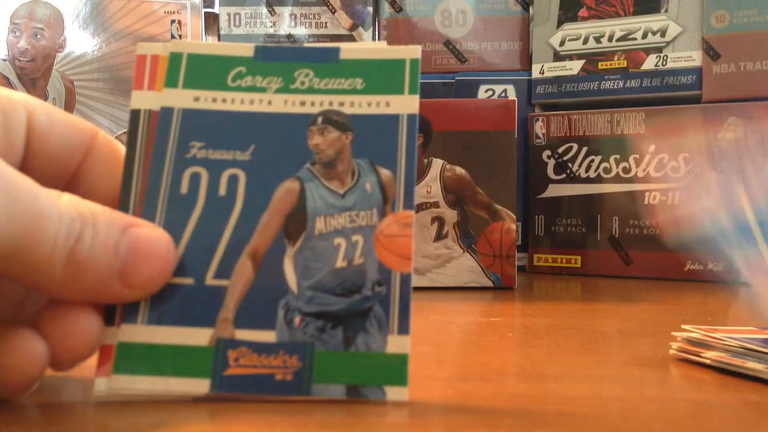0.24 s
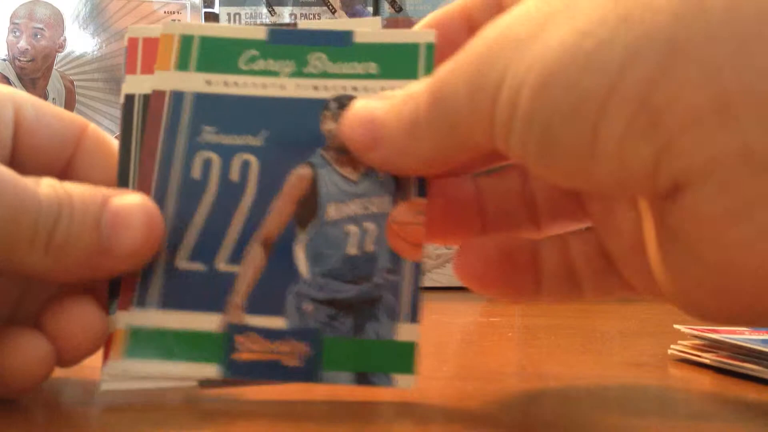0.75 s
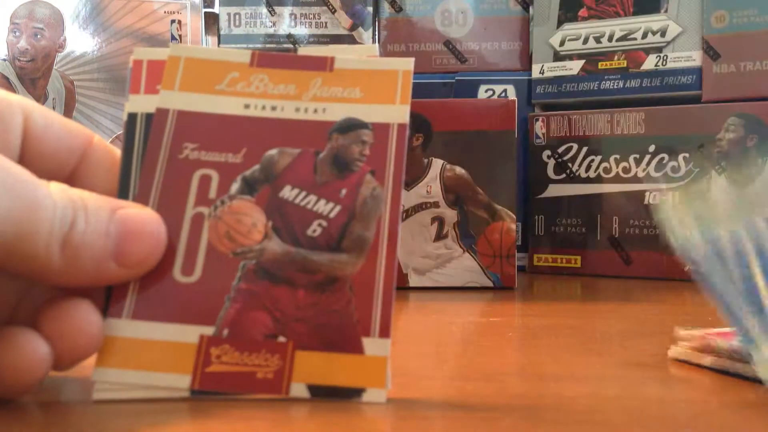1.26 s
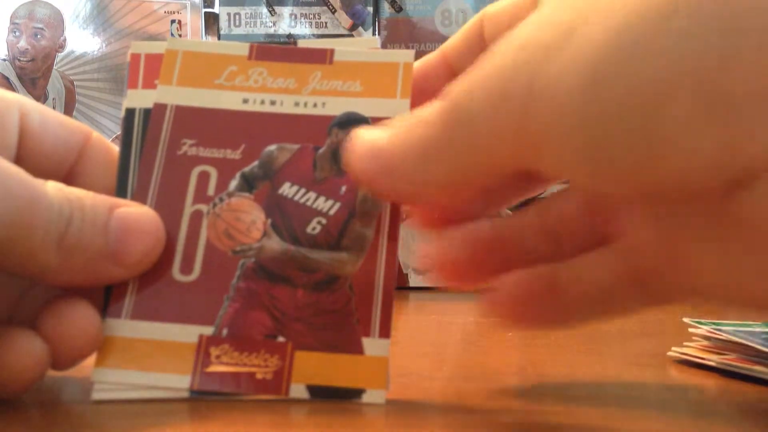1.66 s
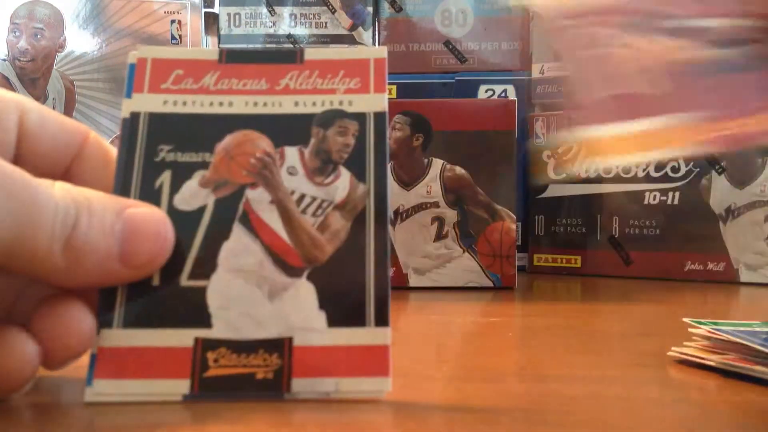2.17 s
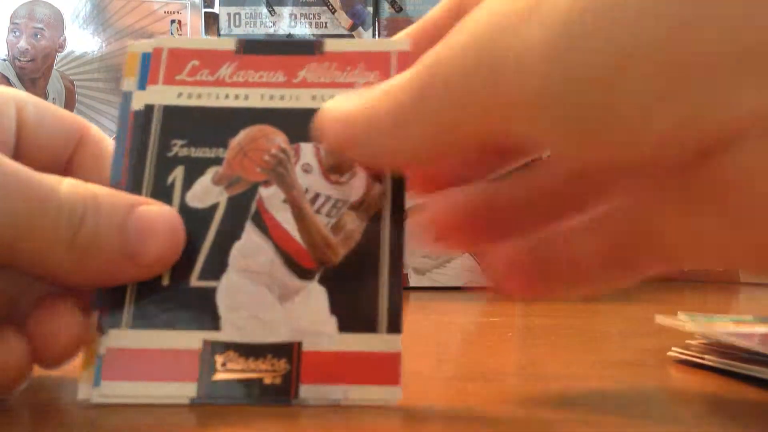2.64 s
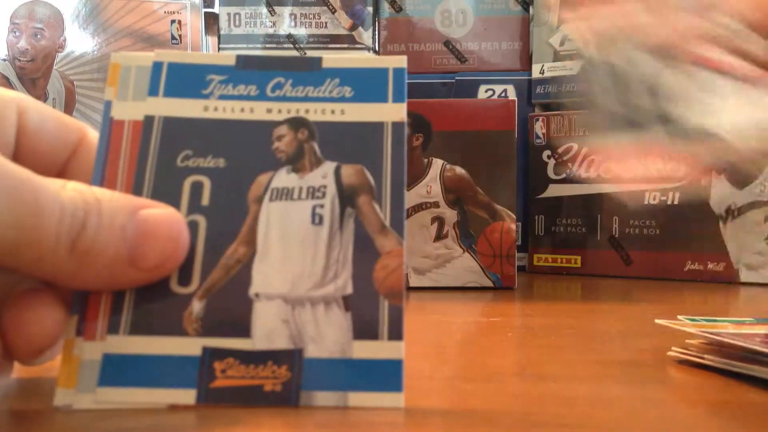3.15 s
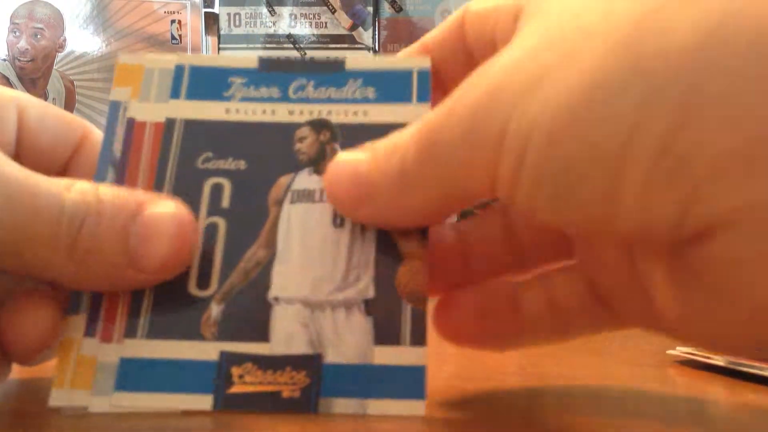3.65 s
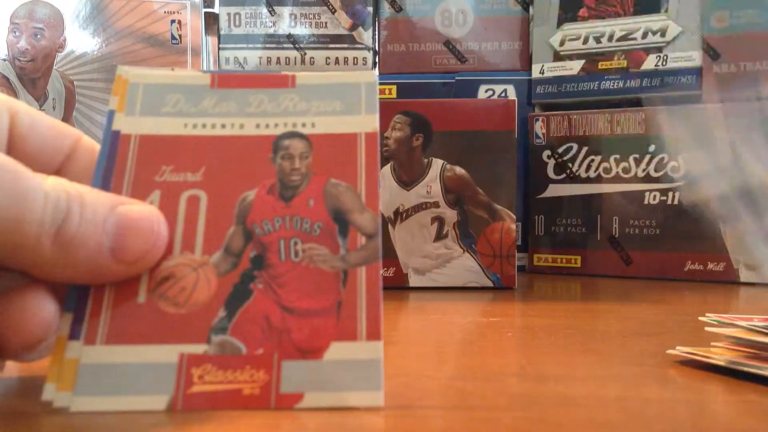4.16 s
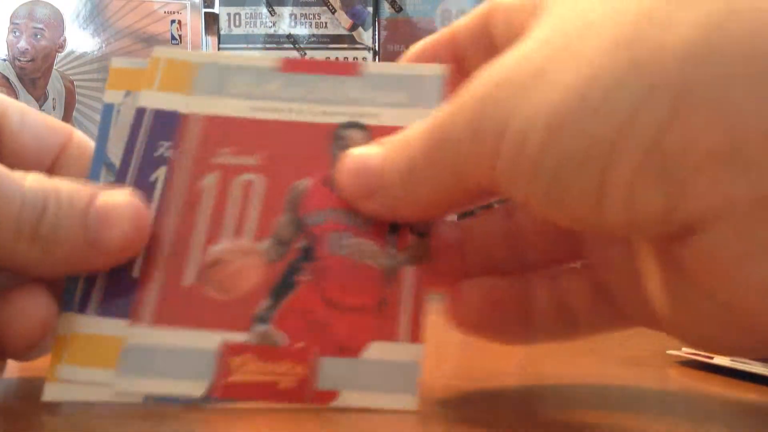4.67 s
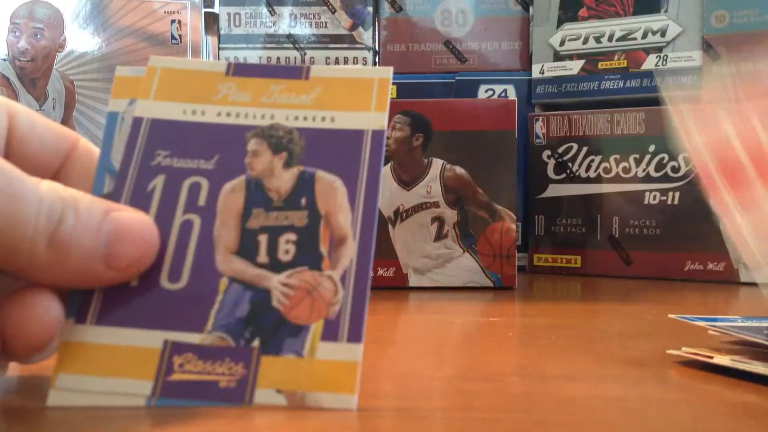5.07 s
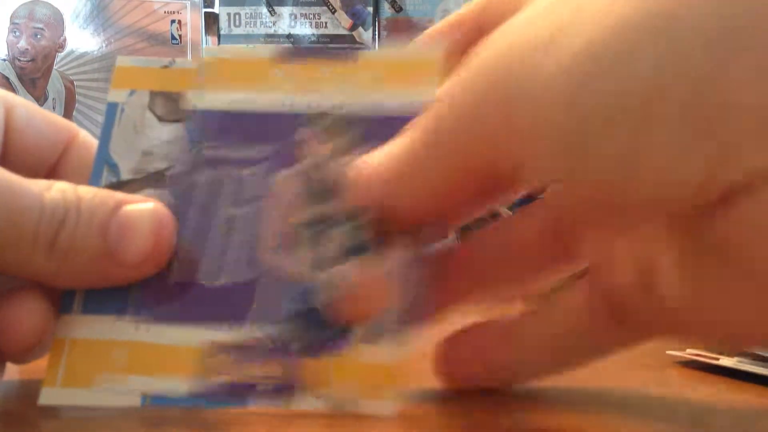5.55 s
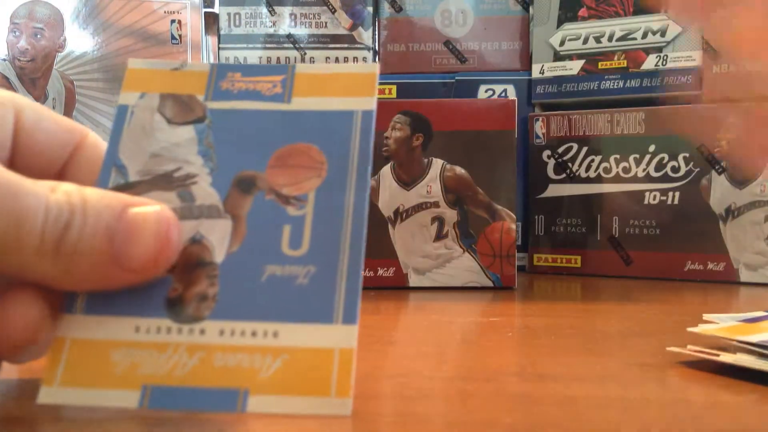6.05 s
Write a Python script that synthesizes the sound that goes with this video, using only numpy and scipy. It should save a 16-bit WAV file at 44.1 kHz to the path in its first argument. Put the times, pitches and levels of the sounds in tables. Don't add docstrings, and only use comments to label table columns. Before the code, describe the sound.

Close up in a small room, seven cards slap down about a second apart, each with a crisp crack and dull table thud.

```python
import sys
import numpy as np
from scipy import signal
from scipy.fft import rfft, irfft
from scipy.io import wavfile
from scipy.ndimage import uniform_filter1d

SR = 44100
rng = np.random.default_rng(int(sys.argv[2]) if len(sys.argv) > 2 else 0)


def invert_db(x):
    u = np.asarray(x, float) / 20
    return 10 ** u


def materialize(psi):
    bounded = np.clip(np.atleast_2d(psi).T, -1, 1)
    quanta = np.round(bounded * 32767).astype(np.int16)
    wavfile.write(sys.argv[1], SR, quanta)


N = 278295

# [f/Hz, width/Hz, level/dB]
CARD_MODES = [(1420, 510, -6), (1710, 420, -9), (2030, 280, -4.5), (2440, 930, -8.5), (3180, 1600, -10),
              (4400, 1400, -12), (5100, 2170, -12.5)]
# [f/Hz, width/Hz, level/dB]
PILE_MODES = [(258, 100, 3), (393, 78.5, 6), (546, 180, 2), (654, 130, -1.5), (852, 352, 1)]
# [t/s, peak level/dB, card ring f/Hz, pile knock re peak/dB]
FIRST_TOUCHES = [
    (0.3504, -24, 1870, -2),
    (1.3245, -28.5, 1940, 3.5),
    (1.329, -34, 1320, 1),
    (2.384, -34.5, 1800, 0.5),
    (2.392, -39.5, 1647, 0),
    (3.3108, -29.5, 1843, -1),
    (4.2571, -22, 1790, -8),
    (5.1989, -22.5, 1650, -8.5),
    (5.9536, -31, 2410, 4.5),
]


def ring(x, hz, width):
    return signal.lfilter(*signal.iirpeak(min(hz, .45 * SR), hz / max(width, 5), fs=SR), x)


def steep(x, hz, width):
    return ring(ring(x, hz, width), hz, width)


def modes(x, table):
    return sum((-1) ** k * invert_db(db) * steep(x, hz, width) for k, (hz, width, db) in enumerate(table))


def above(x, hz):
    return signal.sosfilt(signal.butter(3, hz, "high", fs=SR, output="sos"), x)


def below(x, hz, order=2):
    return signal.sosfilt(signal.butter(order, min(hz, .45 * SR), fs=SR, output="sos"), x)


def peak1(x):
    return x / np.abs(x).max()


def rms1(x):
    return x / np.sqrt(np.mean(x ** 2))


def add(out, s, x):
    i = int(s * SR)
    out[i:i + len(x)] += x[:N - i]


def walk(rate):
    k = int(SR / rate)
    steps = np.repeat(rng.standard_normal(N // k + 1), k)
    return 1.3 * uniform_filter1d(uniform_filter1d(steps, k), k)[:N]


def hush():
    # [f/Hz, level per Hz/dB]
    colour = [(18, -38.5), (30, -6.5), (110, -8), (190, -4.5), (290, -5), (735, -19.5), (1920, -24),
              (15000, -24)]
    hz_at, db_at = np.transpose(colour)
    hz = np.maximum(np.fft.rfftfreq(N, 1 / SR), 1)
    gain = invert_db(np.interp(np.log(hz), np.log(hz_at), db_at))
    noise = irfft(rfft(rng.standard_normal(N)) * gain, N)
    hiss = signal.sosfiltfilt(signal.butter(2, 700, "high", fs=SR, output="sos"), noise)
    rumble = (noise - hiss) * invert_db(1.8 * walk(3) + 1.8 * walk(14))
    return invert_db(-62) * rms1(hiss + rumble)


def landing_blows():
    # [t/s, peak level/dB, card ring f/Hz, edge click re peak/dB, pile knock re peak/dB]
    rattles = [
        (1.3529, -18, 3570, -12, -6),
        (1.3524, -21, 2312, -24, -11.5),
        (1.3635, -20.5, 2150, -6.5, -10.5),
        (2.0931, -36.5, 1344, -62, -12),
        (2.4273, -42, 1790, -4.5, 4.5),
        (3.359, -17.5, 1775, -5, -10.5),
        (4.2819, -16.5, 2440, -13, -12),
        (4.2987, -15, 2230, -3.5, -0.5),
        (5.9686, -30, 2100, -14, -3.5),
        (5.9818, -27.5, 3150, 10.5, -4),
    ]
    # [t/s, peak level/dB, card ring f/Hz, edge click re peak/dB, pile knock re peak/dB]
    face_snaps = [(0.3855, -23, 2440, -5, -31), (1.3707, -15, 4500, -10, -27), (1.3758, -24, 1727, -6, -26),
                  (1.38, -28.5, 2990, 2, 3), (3.3361, -8.5, 2440, -11, -10), (3.3622, -14.5, 3310, 1, -12),
                  (5.22, -12, 2430, -6, -6), (5.229, -23, 2480, -16, -5), (5.2392, -19.5, 2650, -17, -18.5),
                  (5.2478, -16.5, 3233, 0.5, -5), (5.987, -17.5, 3340, -11, -17)]
    # [t/s, peak level/dB, card ring f/Hz]
    bounces = [(0.3775, -34, 2000), (0.3942, -33.5, 3050), (0.3984, -43, 2020), (1.3395, -33, 2030),
               (1.3704, -28.5, 1810), (3.324, -34, 2580), (3.35, -22.5, 3660), (3.3724, -35.5, 3180),
               (3.3825, -41, 4580), (5.2138, -30, 2570), (4.318, -28, 2100), (5.2576, -31, 2410)]
    return ([(s, db, hz, -24, knock_db, 4.4) for s, db, hz, knock_db in FIRST_TOUCHES]
            + [(*row, 6.5) for row in rattles]
            + [(*row, 2.6) for row in face_snaps]
            + [(s, db, hz, -11, -10, 2.9) for s, db, hz in bounces])


def blows():
    # [t/s, peak level/dB, card ring f/Hz, stack knock re peak/dB]
    grips = [(0.7167, -51.5, 1540, -24), (0.726, -44, 1420, -3), (1.1265, -54.5, 1710, -13),
             (1.8184, -51, 965, 1), (2.7309, -50.5, 1230, 3.5), (2.7665, -41.5, 1120, 4.5),
             (3.0131, -53.5, 1370, -2.5), (3.7166, -36.5, 1440, -1), (3.7218, -40.5, 1440, -9),
             (3.8062, -54, 1500, -10), (3.907, -48, 2210, -27), (3.93, -47, 1520, -16),
             (3.9708, -41.5, 1295, -10), (3.9997, -37, 1420, -15), (4.6078, -46, 1390, -1),
             (4.6345, -48, 1510, 1.5), (4.8415, -35, 1510, 1), (4.8616, -46, 1400, -7),
             (5.6032, -47.5, 1480, 1), (5.6682, -47, 1443, -16), (5.7354, -33.5, 2300, -26),
             (5.735, -34, 910, -2.5), (2.0929, -38.5, 1930, -2.5), (4.8423, -38.5, 2760, -1),
             (4.036, -39.5, 1420, -15)]
    # [t/s, peak level/dB, card ring f/Hz, stack knock re peak/dB]
    flicks = [(0.7716, -48.5, 1400, -4), (0.8631, -57.5, 1060, 6.5), (0.9894, -53, 1300, 6),
              (1.0668, -49.5, 2180, -19), (1.1069, -47, 2150, -5.5), (2.1735, -45.5, 940, -6),
              (2.7147, -50, 2150, 1), (2.7861, -44, 1370, -1.5), (2.8247, -49.5, 1370, -11),
              (2.84, -48.5, 1380, -16), (2.8822, -56.5, 1340, -2), (2.912, -50.5, 2730, -4),
              (3.076, -43.5, 1250, -0.5), (3.089, -34, 1380, -10), (3.8004, -46, 1640, -13),
              (4.7351, -51.5, 2190, -2.5), (4.767, -52, 1440, -13), (4.9451, -41, 1360, -0.5),
              (5.1065, -49.5, 1045, -6), (5.6228, -36.5, 1412, 3.5), (5.7163, -38, 2530, -24)]
    return (landing_blows()
            + [(s, db, hz, -40.5, knock_db, 3.4) for s, db, hz, knock_db in grips]
            + [(s, db, hz, -6, knock_db, 1.3) for s, db, hz, knock_db in flicks])


def pressure():
    # [start t/s, hardest t/s, end t/s, scrape level/dB, surface hiss re scrape/dB]
    strokes = [(0.0, 0.009, 0.077, -65, -6), (0.709, 0.708, 0.75, -62, -10),
               (0.873, 0.977, 0.97, -64.5, -15), (0.993, 1.112, 1.16, -64.5, -1),
               (1.775, 1.804, 3.4, -77.5, -8), (2.063, 2.138, 2.09, -59.5, -25),
               (2.4, 2.4, 2.44, -47.5, -14), (2.683, 2.718, 2.86, -72, -5), (2.797, 2.892, 3.05, -68.5, -4),
               (2.95, 3.03, 3.06, -69, -28), (3.083, 3.116, 3.134, -51.5, -5),
               (3.133, 3.16, 3.21, -63.5, -7.5), (3.299, 3.32, 3.313, -52.5, -17.5),
               (3.622, 3.712, 3.87, -66, -35), (3.78, 3.95, 3.97, -65.5, -26),
               (3.97, 3.992, 3.99, -54, -12), (3.994, 4.033, 4.052, -51, -8.5),
               (4.596, 4.612, 4.77, -65, -21), (4.75, 4.794, 4.88, -64.5, -17), (4.85, 4.95, 5, -60, -15),
               (4.947, 4.981, 4.99, -50.5, -5.5), (4.994, 5.028, 4.9, -72.5, -4),
               (5.619, 5.64, 5.75, -59.5, -14), (5.674, 5.692, 5.731, -54, -8)]
    rise_db, fall_db, rumble_db = 8.5, 16, 3
    t, gain = np.arange(N) / SR, np.zeros((3, N))
    for start, hardest, end, db, hiss_db in strokes:
        now = slice(max(int(start * SR), 0), int(end * SR))
        stroke_db = db - np.interp(t[now], [start, hardest, end], [rise_db, 0, fall_db])
        gain[:, now] += invert_db(stroke_db + np.array([[0], [hiss_db], [rumble_db]]))

    before_db, before_s = (-28, -27.5, -30), 0.0022
    after_db, after_s = (-16, -20, -13.5), 0.0064
    drag_delay_s = .0026
    for s, db, hz, edge_db, knock_db, ms in landing_blows():
        now = slice(int(s * SR) - 2048, int(s * SR) + 4096)
        since = t[now] - s - drag_delay_s
        own_db = db + np.array([0, edge_db, 0])
        before = invert_db(own_db + before_db)[:, None] * np.exp(-abs(since) / before_s)
        after = invert_db(own_db + after_db)[:, None] * np.exp(-abs(since) / after_s)
        airborne = any(s == touch[0] for touch in FIRST_TOUCHES)
        gain[:, now] += np.where(since < 0, before * (not airborne), after)
    return gain


def slides():
    # [ratio to the grip's ring, level/dB]
    singing = [(0.5, -7), (1, 4.5), (1.56, -4.5), (2.5, -9)]
    sing_db, sing_width_hz = -4, 170
    grains = rng.standard_normal(N) * invert_db(2.0 * rng.exponential(size=N)) * invert_db(2.5 * walk(160))
    swish = rng.standard_normal(N) * invert_db(2.0 * walk(220))
    card = rms1(modes(grains, CARD_MODES))
    blow_s, blow_hz = np.transpose(sorted(blows()))[[0, 2]]
    halfway_s = (blow_s[1:] + blow_s[:-1]) / 2
    edges = np.r_[0, (halfway_s * SR).astype(int), N]
    for a, b, hz in zip(edges, edges[1:], blow_hz):
        rings = [(ratio * hz, sing_width_hz, db) for ratio, db in singing]
        card[a:b] = 0.87 * card[a:b] + invert_db(sing_db) * rms1(modes(grains[a:b], rings))
    hiss = rms1(below(above(swish, 3700), 6800, order=4))
    rumble = rms1(modes(grains, PILE_MODES))
    gain = uniform_filter1d(pressure(), int(.003 * SR), axis=1)
    return (gain * np.array([card, hiss, rumble])).sum(axis=0)


def thuds():
    # [t/s, peak level/dB, table ring f/Hz, upper modes level/dB]
    slaps = [(0.003, -45.5, 174, -6), (0.4, -18, 130, 4), (0.718, -43, 414, -21), (0.932, -46, 106, -1),
             (1.112, -39, 188, 7.5), (1.381, -13.5, 148.9, -2), (1.393, -22, 186, -1.5),
             (1.805, -52, 116, -13), (2.095, -41, 137, -1), (2.428, -32, 202.6, -0.5),
             (2.432, -18.5, 136.3, -2), (2.785, -38, 93, -8.5), (3.013, -42.5, 134, 1.5),
             (3.087, -33.5, 180.6, 7), (3.36, -23, 155.6, -5), (3.374, -28, 193.4, -11.5),
             (3.717, -38, 100.6, -3), (3.798, -54, 112.5, -19), (3.928, -47, 129, -7.5),
             (3.972, -39.5, 126, 2), (4.301, -19.5, 133.4, -18), (4.63, -43, 97, -23), (4.86, -39, 204, -2),
             (4.944, -47, 80, 7), (5.248, -21.5, 132, -30), (5.262, -22.5, 141, 0), (5.602, -39.5, 127, -3),
             (5.625, -35, 94.2, -7), (5.954, -27.5, 105.6, -1), (5.99, -23.5, 95.6, 5.5)]
    # [ratio to main ring, level/dB, time to fall 60 dB/s]
    table_modes = [(.62, -20.5, 0.12), (1.58, -2.5, 0.09), (1.9, -4.5, 0.063), (2.9, -7.5, 0.082)]
    out, t = np.zeros(N), np.arange(11000) / SR
    push = np.hanning(int(0.0025 * SR))
    for s, db, hz, upper_db in slaps:
        top = np.sin(2 * np.pi * hz * t) * 1e-3 ** (t / 0.087)
        for ratio, mode_db, t60 in table_modes:
            top = top + invert_db(mode_db + upper_db) * np.sin(2 * np.pi * ratio * hz * t) * 1e-3 ** (t / t60)
        add(out, s + 0.0011, invert_db(db) * peak1(np.convolve(top, push)))
    return out


def snaps():
    out, t = np.zeros(N), np.arange(2048) / SR
    for s, db, hz, edge_db, knock_db, ms in blows():
        chatter = rng.standard_normal(len(t))
        contact_s = np.clip(ms, .2, 12) / 1000
        force = chatter * (1 - np.exp(-t / 0.00015)) * np.exp(-t / contact_s)
        force = force - 4.4 * np.exp(-t / .00003)
        blunt = below(force, 2600 * invert_db(0.33 * (edge_db + 36.5)))
        card = ring(blunt, hz, 59 + 0.045 * hz) + invert_db(-6.5) * modes(blunt, CARD_MODES)
        edge = below(above(force * np.exp(-t / .003), 3600), 12000)
        knock = modes(-np.exp(-t / 0.0004) + .3 * force, PILE_MODES)
        blow = peak1(card) + invert_db(edge_db + 7.5) * peak1(edge) + invert_db(knock_db) * peak1(knock)
        add(out, s + .0011, invert_db(db) * blow)
    return out


def cracks():
    # [t/s, peak level/dB, sign, width/ms]
    corner_cracks = [
        (.3871, -24, 1, .05),
        (1.3546, -16, -1, .06),
        (1.3692, -17, -1, .05),
        (3.3360, -5, -1, .06),
        (3.3644, -1.5, 1, .045),
        (4.2970, -17, -1, .05),
        (4.3002, -13, -1, .09),
        (5.2212, -10, -1, .08),
        (5.2502, -13, -1, .05),
        (5.9835, -.5, -1, .027),
    ]
    out, t = np.zeros(N), np.arange(-64, 64) / SR
    for s, db, sign, ms in corner_cracks:
        u = (t / (max(ms, .02) / 1000)) ** 2
        add(out, s + t[0], np.sign(sign) * invert_db(db) * (1 - u) * np.exp(-u / 2))
    return out


def wash(x, hz, width, t60, db):
    keep, fill = 1e-6 ** (1 / (t60 * SR)), np.exp(-1 / (.006 * SR))
    energy = signal.lfilter([1 - keep], [1, -keep], steep(x, hz, width) ** 2)
    energy = signal.lfilter([1 - fill], [1, -fill], energy)
    return invert_db(db) * np.sqrt(energy) * rms1(steep(rng.standard_normal(N), hz, width))


def room(x):
    # [f/Hz, width/Hz, time to fall 60 dB/s, level/dB]
    boxes = (2428, 260, 0.45, -25)
    # [f/Hz, time to fall 60 dB/s, level/dB]
    echoes = [(119.7, 0.29, -14), (300, 0.38, -14.5), (800, 0.25, -16), (2000, 0.3, -17.5),
              (4500, .3, -13.5), (9000, 0.072, -22), (14000, 0.13, -11)]
    out = wash(x, *boxes)
    hz_at, t60_at, db_at = np.transpose(echoes)
    for hz in 90 * 2 ** np.arange(0, 7.4, .4):
        t60 = np.interp(np.log(hz), np.log(hz_at), t60_at)
        db = np.interp(np.log(hz), np.log(hz_at), db_at)
        out = out + wash(x, hz, hz / 2.5, t60, db)
    return out


def scene():
    cards = snaps() + cracks() + thuds() + slides()
    return (cards + room(cards) + hush())[None, :]


def top_cut(x):
    return signal.sosfilt(signal.butter(12, 16500, fs=SR, output="sos"), x)


def record(dry):
    x = signal.sosfilt(signal.butter(3, 55, "high", fs=SR, output="sos"), dry)
    keep = np.exp(-1 / (.45 * SR))
    loudness = signal.lfilter([1 - keep], [1, -keep], x ** 2)
    x = x * invert_db(-np.minimum(3300.0 * loudness, 3))
    x = below(x, 13000, order=1)
    x = signal.sosfilt(signal.ellip(6, .3, 46, 15250, fs=SR, output="sos"), x)
    return top_cut(x)


dry = scene()
out = record(dry)
materialize(out)
```